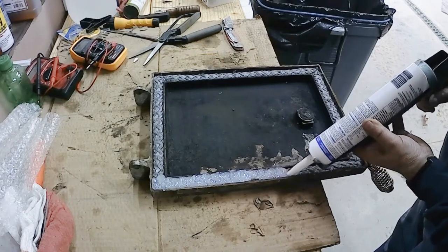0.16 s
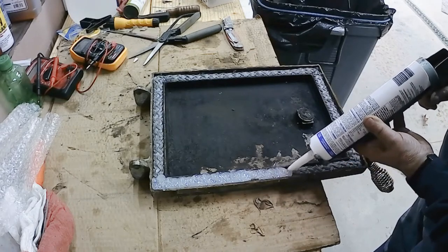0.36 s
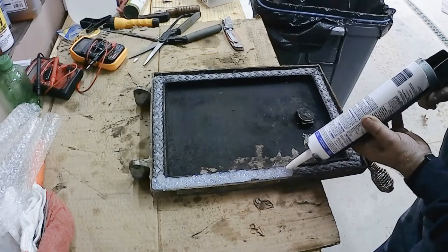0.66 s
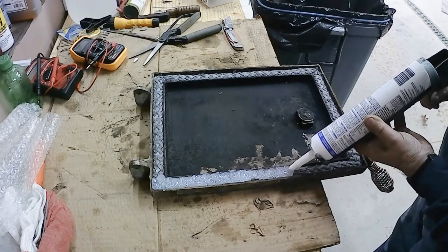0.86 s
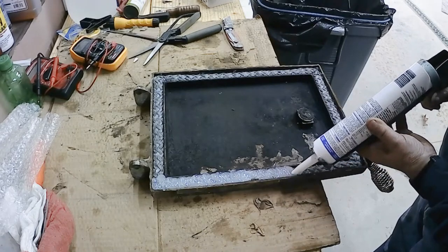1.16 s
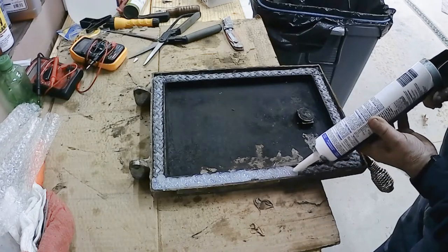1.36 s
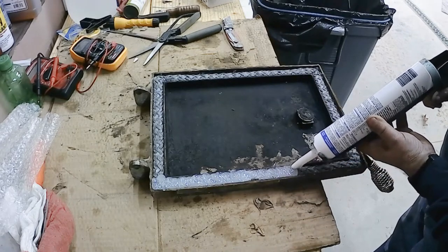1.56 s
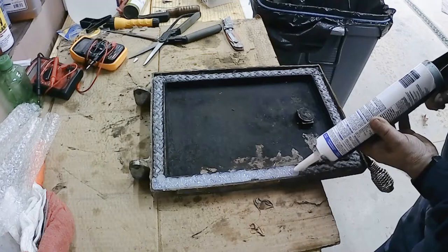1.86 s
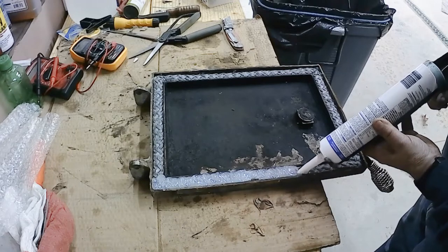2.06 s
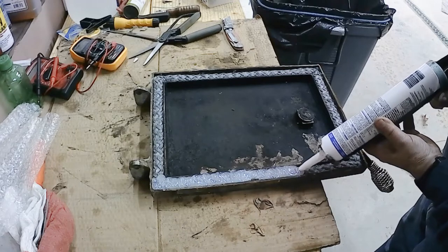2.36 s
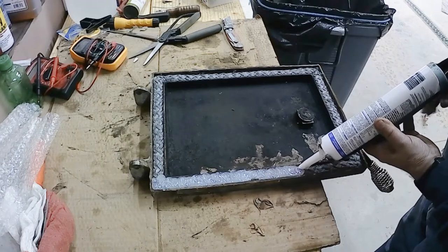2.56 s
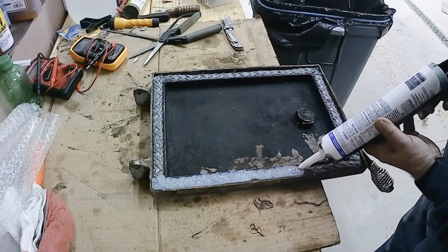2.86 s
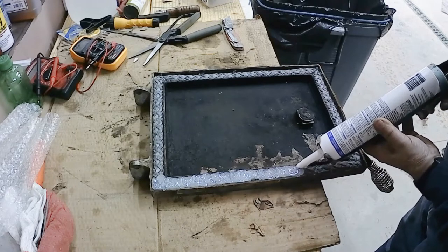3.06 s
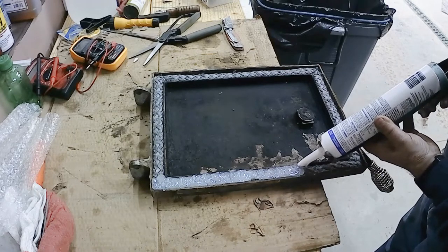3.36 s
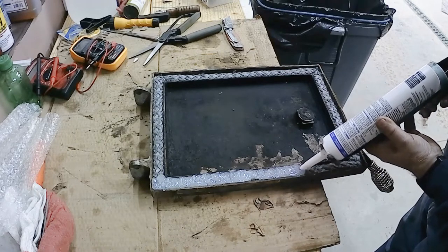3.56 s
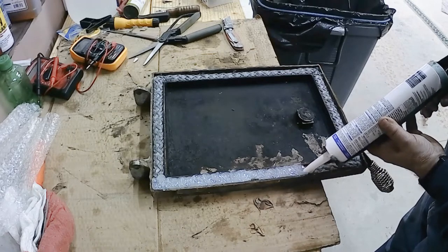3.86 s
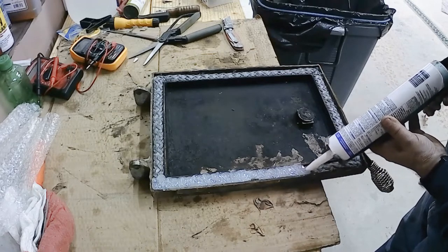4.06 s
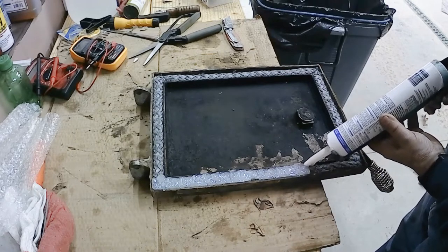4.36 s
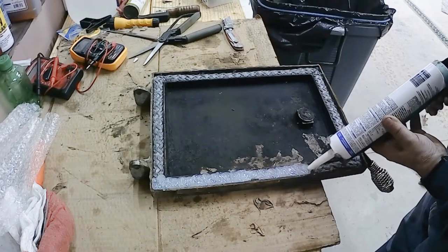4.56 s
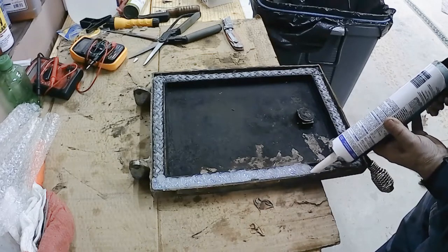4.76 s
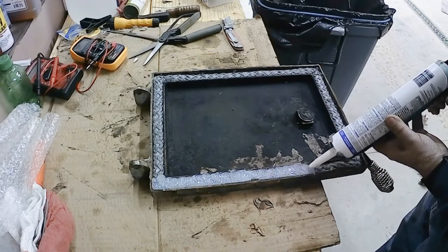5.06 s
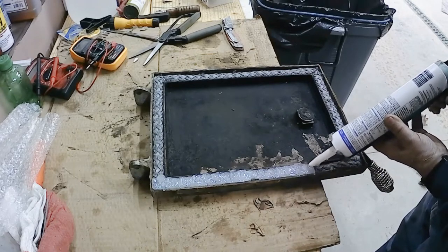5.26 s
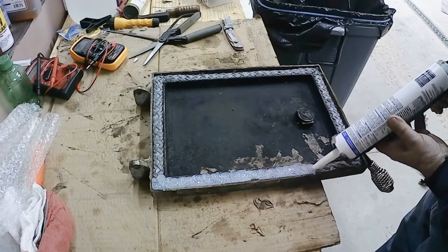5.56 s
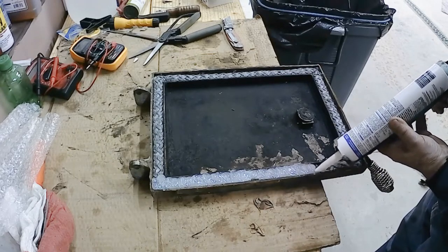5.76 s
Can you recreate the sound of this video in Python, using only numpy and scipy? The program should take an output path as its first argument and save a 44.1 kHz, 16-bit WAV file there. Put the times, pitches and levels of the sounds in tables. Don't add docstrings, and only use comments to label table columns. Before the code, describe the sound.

A steady, dark hiss of air fills a barn, and a distant machine puffs almost inaudibly each second. In the foreground, a caulking gun's grip plate snaps hard on its rod once, then twice in quick succession after a flurry of tiny clicks. Each clack is short, metallic and hollow, with a small room echo; afterwards almost only the air remains.

```python
import sys
import numpy as np
from scipy import signal
from scipy.fft import rfft, irfft
from scipy.io import wavfile

SR = 44100
rng = np.random.default_rng(int(sys.argv[2]) if len(sys.argv) > 2 else 0)


def voltage_ratio(decibels):
    exponent = np.asarray(decibels, float) / 20
    return 10 ** exponent


def file_out(sig):
    cols = np.atleast_2d(sig).T
    lim = np.clip(cols, -1, 1)
    pcm = np.round(lim * 32767).astype(np.int16)
    wavfile.write(sys.argv[1], SR, pcm)


N = 260631


def at_hz(points, hz):
    table = np.array(points)
    return np.interp(np.log(hz), np.log(table[:, 0]), table[:, 1])


def rms_one(x):
    return x / np.sqrt(np.mean(x ** 2) + 1e-20)


def add(track, s, sound):
    at = round(s * SR)
    track[at:at + len(sound)] += sound[:N - at]


def coloured(spectrum, size):
    hz = np.maximum(np.fft.rfftfreq(size, 1 / SR), 10)
    white = rfft(rng.standard_normal(size))
    return rms_one(irfft(white * voltage_ratio(at_hz(spectrum, hz)), size))


def resonate(x, hz, width_hz):
    r = np.exp(-np.pi * width_hz / SR)
    return rms_one(signal.lfilter([1, 0, -1], [1, -2 * r * np.cos(2 * np.pi * hz / SR), r * r], x))


# frequency in Hz, level in dB per Hz.
RUSH_SPECTRUM = [(12, -57), (20, -27), (57, -8), (143, -0.5), (203, -0.5), (378, -3.5), (421, -5.5),
                 (567, -6.5), (1110, -11.5), (1420, -12), (2120, -19), (5320, -28.5), (12600, -32),
                 (16400, -62), (22000, -120)]


def rush():
    spectrum = RUSH_SPECTRUM[:-1] + [(20000, RUSH_SPECTRUM[-2][1] - 3)]
    whistle = resonate(rng.standard_normal(N), 4300, 140)
    return voltage_ratio(-45.5) * (coloured(spectrum, N) + voltage_ratio(-28) * whistle)


# centre in Hz, width in Hz, level in dB.
PUFF_RESONANCES = [(300, 250, -4), (650, 350, -3), (1050, 450, -3), (1480, 350, 0)]


def puffs():
    first_s, period_s, level_db = 0.47, 1.003, -51.5
    white, gate, t = rng.standard_normal(N), np.zeros(N), np.arange(SR // 2) / SR
    air = sum(voltage_ratio(db) * resonate(white, hz, width_hz) for hz, width_hz, db in PUFF_RESONANCES)
    stroke = 2 * (1 - np.exp(-t / 0.032)) * np.exp(-(t / 0.094) ** 2)
    for s in np.arange(first_s, N / SR, period_s):
        add(gate, s, voltage_ratio(level_db) * stroke)
    dull = signal.butter(4, 1900, fs=SR, output="sos")
    return gate * rms_one(signal.sosfilt(dull, air))


def ring(clicks, hz, t60):
    r, w = voltage_ratio(-60 / (t60 * SR)), 2 * np.pi * hz / SR
    return signal.lfilter([0, np.sin(w)], [1, -2 * r * np.cos(w), r * r], clicks + 1e-18)


# frequency in Hz, T60 in seconds, levels in
# dB in snaps one, two and three.
GUN_RESONANCES = [(494, 0.048, -29, -45, -25), (565.8, 0.11, -14.5, -15.5, -16.5), (535, 0.039, -22, -52, -42),
                  (895, 0.044, -14.5, -9, -15.5), (1000, 0.042, -24, -11, -18.5),
                  (1286, 0.022, -6.5, -13.5, -11.5), (1497, 0.076, -30, -38, -12.5),
                  (1522, 0.062, -6.5, -6.5, -14), (1560, 0.018, 4.5, 2, 0), (1768, 0.015, -1.5, -6, -1.5),
                  (2068, 0.17, -21, -33, -34), (2085, 0.019, 3, -2, -1.5), (2462, 0.045, -36, -15, -15.5),
                  (2700, 0.024, -50, -28, -27), (3255, 0.022, -27, -10.5, -18), (3480, .03, -14.5, -13, -16.5),
             (3880, 0.05, -34, -37, -28), (3980, 0.11, -23.5, -36, -29), (4350, 0.013, -13, -39, -15.5),
             (4670, 0.013, -20, -11, -18), (5160, 0.045, -40, -32, -27), (6060, 0.028, -22, -19.5, -21.5),
             (6730, 0.022, -25, -21, -28), (7380, 0.035, -23, -39, -23), (8770, 0.012, -19, -16.5, -19),
             (9750, 0.013, -15.5, -27, -24)]
GUN_MODES = np.array(GUN_RESONANCES)


def strike(push, levels_db):
    push = np.pad(push, (0, SR // 2))
    sound = 0
    for k, ((hz, t60), db) in enumerate(zip(GUN_MODES[:, :2], levels_db)):
        sound = sound + (-1) ** k * voltage_ratio(db) * ring(push, hz, t60)
    return sound


# frequency in Hz, level in dB per Hz.
ECHO_SPECTRUM = [(180, -32), (400, 10), (560, 3.5), (1000, 2.5), (1700, -6), (3000, 1), (5000, 3.5),
                 (8500, -3.5), (10500, -2.5), (12000, -19)]
# frequency in Hz, T60 in seconds.
ECHO_DECAY = [(400, 0.4), (1500, 0.36), (4000, 0.28), (12000, 0.22)]


def echo(sound, db, unseen=0):
    t, tail = np.arange(SR // 2) / SR, 0
    noise = coloured(ECHO_SPECTRUM, SR // 2)
    edges = 280 * 2 ** np.arange(0, 5.6, 0.5)
    for low, high in zip(edges, edges[1:]):
        band = signal.sosfilt(signal.butter(2, [low, high], "band", fs=SR, output="sos"), noise)
        clumps = voltage_ratio(1.2 * np.interp(t, np.arange(51) / 100, rng.standard_normal(51)))
        tail = tail + clumps * band * voltage_ratio(-60 * t / at_hz(ECHO_DECAY, np.sqrt(low * high)))
    swell = 1 - np.exp(-(t / 0.0053) ** 2)
    tail = rms_one(tail * swell) / np.sqrt(len(t))
    return sound + voltage_ratio(db) * signal.fftconvolve(sound + unseen, tail)[:len(sound)]


# start in seconds, peak level in dB, contact time in ms.
SLIPS_UNDER_LOAD = [(1.5355, -30.5, 0.73), (1.781, -39, 0.15), (2.386, -31.5, 0.45), (2.459, -27.5, 0.3),
                    (2.462, -28.5, 0.33), (2.466, -27, 0.46), (2.481, -32, .4), (2.495, -35.5, 1.2),
                    (2.527, -27.5, 1.4), (2.676, -44, 0.57), (2.716, -26, 2.2), (2.7232, -27, 2.5),
                    (2.738, -35, 1.72), (2.778, -43, 2.2), (2.797, -40, 0.46), (4.775, -42, 1.2),
                    (5.65, -54, 1.8)]


def slips():
    out = np.zeros(N)
    spread = rng.normal(0, 3, (len(SLIPS_UNDER_LOAD), len(GUN_MODES)))
    is_cartridge = GUN_MODES[:, 0] < 700
    for (s, db, contact_ms), own_db in zip(SLIPS_UNDER_LOAD, spread):
        cartridge_db = 20.5 if contact_ms > 0.75 else -2
        phase = np.arange(100) / (contact_ms * SR / 1000)
        push = np.sin(np.pi * np.minimum(phase, 1)) ** 2
        levels_db = GUN_MODES[:, 2:].mean(axis=1) + own_db + cartridge_db * is_cartridge
        add(out, s, voltage_ratio(db) * strike(push / push.sum(), levels_db))
    return echo(out, -12)


# start in seconds, peak level in dB, lead-in tick in dB,
# chatter time in ms, far-side snap in dB.
PLATE_SNAPS = [
    (1.6914, -6.5, -18, 7.3, -20.5),
    (2.5479, -5, -36, 6.7, -13),
    (2.6499, -4, -31, 4.1, -14),
]


def snaps():
    crack_db, echo_db, tick_lead_s = -20, -17, 0.0012
    out, t = np.zeros(N), np.arange(SR // 50) / SR
    for k, (s, db, tick_db, chatter_ms, far_db) in enumerate(PLATE_SNAPS):
        levels_db = GUN_MODES[:, 2 + k]
        contacts = rng.standard_normal(len(t)) * (rng.random(len(t)) < 0.12)
        chatter = contacts * 0.15 * np.exp(-(1000 * t / chatter_ms) ** 2)
        push = np.convolve(chatter, np.hanning(9) / 4)[:len(t)]
        push[0] = 1
        blow = strike(push, levels_db)

        crack_fade = np.exp(-t / 0.0031) + 0.44 * np.exp(-t / 0.0077)
        crack = resonate(rng.standard_normal(len(t)), 5000, 2900) * crack_fade
        crack = voltage_ratio(crack_db) * np.pad(crack, (0, SR // 2))

        far_snap = voltage_ratio(crack_db + far_db) * resonate(np.arange(len(crack)) == 0, 2600, 4000)
        add(out, s, voltage_ratio(db) * echo(blow + crack, echo_db, unseen=far_snap))
        add(out, s - tick_lead_s, voltage_ratio(db + tick_db) * strike(np.hanning(9) / 4, levels_db))
    return out


# start in seconds, length in seconds, level in dB.
PLATE_CREAKS = [
    (2.515, .011, -34),
    (2.52, 0.0133, -23),
]


def creaks():
    out = np.zeros(N)
    for s, length_s, db in PLATE_CREAKS:
        swell = np.sin(np.pi * np.minimum(np.arange(1000) / (length_s * SR), 1))
        drag = swell * rng.standard_normal(1000)
        push = np.convolve(drag, np.hanning(12) / 5)
        add(out, s, voltage_ratio(db - 22) * strike(push, GUN_MODES[:, 2]))
    return echo(out, -12)


def scene():
    no_bass = signal.butter(4, 430, "high", fs=SR, output="sos")
    gun = signal.sosfilt(no_bass, slips() + snaps() + creaks())
    return (rush() + puffs() + gun)[None]


FRAME_S = 1024 / 48000
THIN_LONE = [.328, .498, .712, .818, .968, 1.01, 1.117, 1.949, 2.077, 2.29, 2.354, 3.016, 3.144, 3.4, 4.509,
             5.128, 5.234, 5.874]
THIN_PAIRS = [.178, 1.586, 3.613, 5.789]
# time in seconds, drop level in dB.
THIN_RINGING = [
    (1.714, -57),
    (1.736, -49),
    (1.778, -53),
    (2.44, -55),
    (2.568, -57),
    (2.674, -57),
]


def thin_frames():
    lone = [(s, -61.5) for s in THIN_LONE]
    pairs = [(s + k * FRAME_S, -59) for s in THIN_PAIRS for k in range(2)]
    return sorted(lone + pairs + THIN_RINGING)


def thin(x):
    phase, tilt_db = 0.38, -3.0
    hop = round(FRAME_S * SR)
    n, k = np.arange(2 * hop), np.arange(hop)
    window = np.sin(np.pi * (n + 0.5) / (2 * hop))[:, None]
    basis = np.cos(np.pi / hop * np.outer(n + 0.5 + hop / 2, k + 0.5)) * window
    octaves = np.log2((k + 0.5) * SR / (2 * hop) / 3000)
    out, start = x.copy(), 0
    for s, db in thin_frames():
        centre = round((round(s / FRAME_S - phase) + phase) * FRAME_S * SR)
        follows = abs(centre - start - 2 * hop) < 3
        start = start + hop if follows else centre - hop
        lines = x[start:start + 2 * hop] @ basis * 2 / hop
        band_db = np.repeat(rng.normal(0, 2.5, hop // 12 + 1), 12)[:hop]
        step = voltage_ratio(db - 2 + band_db + tilt_db * octaves)
        lost = lines - step * np.round(lines / step)
        out[start:start + 2 * hop] -= basis @ lost
    return out


def roll_off(x):
    return signal.sosfilt(signal.butter(12, 13710, fs=SR, output="sos"), x)


def record(dry):
    x = 1.674 * np.tanh(dry[0] / 1.516)
    x = signal.sosfilt(signal.ellip(8, 0.5, 36, 12900, fs=SR, output="sos"), x)
    x = signal.sosfilt(signal.cheby2(10, 50, 14600, fs=SR, output="sos"), x)
    mix = thin(x)[None]
    return roll_off(mix)


dry = scene()
out = record(dry)
file_out(out)
```